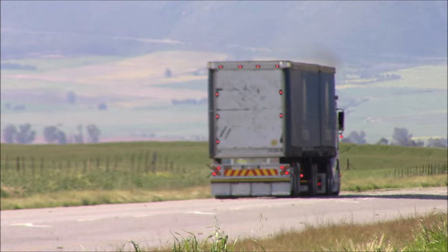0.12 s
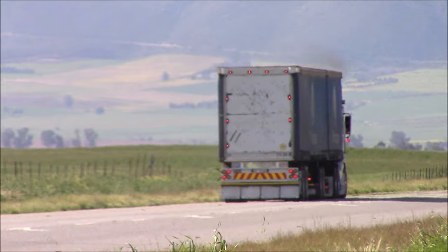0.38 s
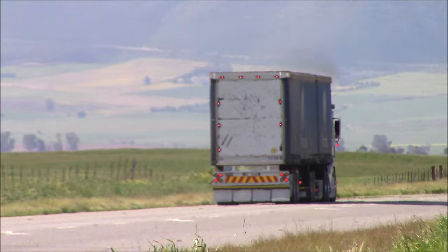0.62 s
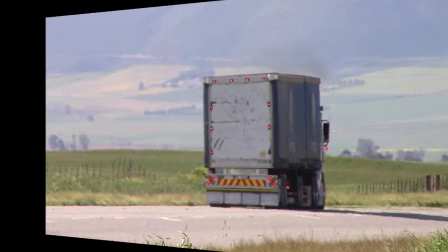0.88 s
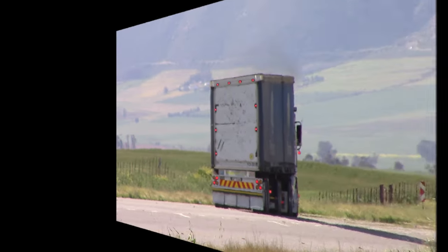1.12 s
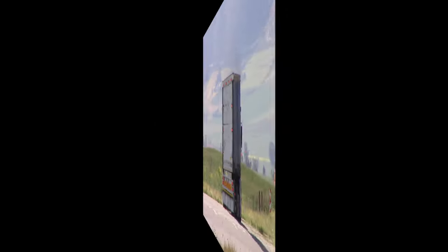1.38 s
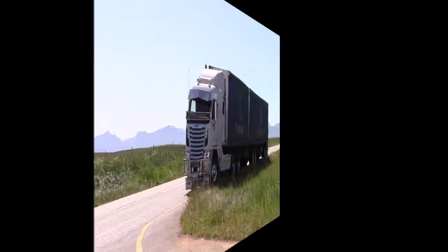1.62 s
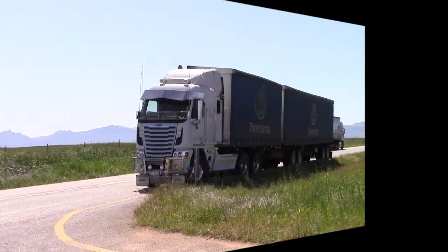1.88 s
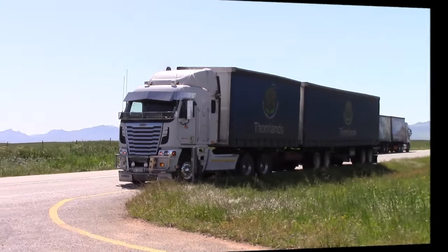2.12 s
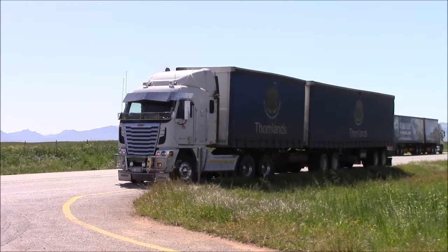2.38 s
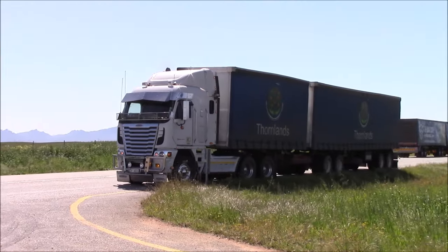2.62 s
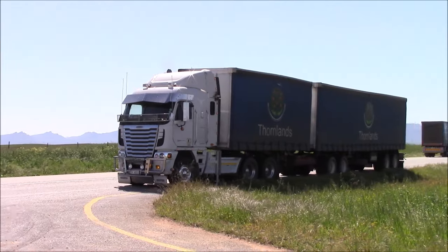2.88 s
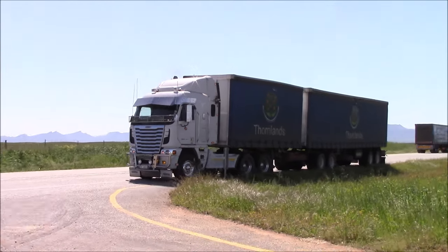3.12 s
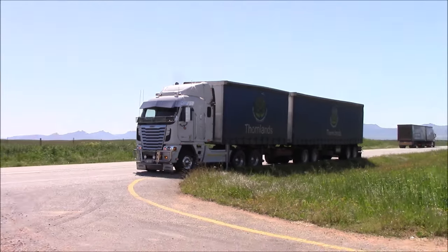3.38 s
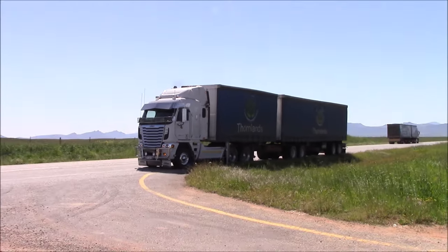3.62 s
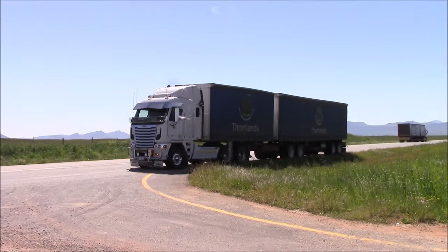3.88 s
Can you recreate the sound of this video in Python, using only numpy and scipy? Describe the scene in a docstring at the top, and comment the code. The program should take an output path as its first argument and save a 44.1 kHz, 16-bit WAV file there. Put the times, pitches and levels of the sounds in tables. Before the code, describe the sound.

A heavy diesel truck engine dominates. From 0 s a distant truck's smooth tyre roar dies away, with a soft low thud near 0.3 s and two faint falling bird chirps around 0.7-0.95 s. From about 0.8 s the close diesel fades in, knocking, clattering and hissing, rising in pitch and loudness until 3.7 s, when the throttle lifts and pitch drops slightly to 4 s. Dry open air, almost centred.

```python
"""An open road: a far truck's tyre roar, with a soft thud and two bird chirps; then the scene changes,
crossfading to a six-cylinder diesel close by that revs up under load until the throttle is lifted. The roar is
coloured noise, the thud a rung resonance, the chirps gliding sines. Exhaust puffs ring the pipes, combustion
knocks ring the block (hardest once per crank turn), and cab roar, panel buzz, clatter and fan hiss pulse with
the firings."""
import sys
import numpy as np
from scipy import signal
from scipy.io import wavfile

SR = 44100
rng = np.random.default_rng(int(sys.argv[2]) if len(sys.argv) > 2 else 0)


def boost_factor(decibels):
    """Convert a level in decibels to a linear amplitude factor."""
    exponent = np.asarray(decibels, float) / 20
    return 10 ** exponent


def wrap_up_sound(samples):
    """Save the sound to the file named by the first command line argument, as 16-bit audio."""
    columns = np.atleast_2d(samples).T
    # keep every value between -1 and 1, then stretch to whole-number steps
    tamed = np.clip(columns, -1, 1)
    steps = np.round(tamed * 32767).astype(np.int16)
    wavfile.write(sys.argv[1], SR, steps)


N = 176400


def rms_one(x):
    """Power normalisation: scales a signal to rms 1."""
    return x / np.sqrt(np.mean(x ** 2) + 1e-20)


def in_time(rows):
    """Linear interpolation: joins each table column over time, sample by sample."""
    times, *columns = np.transpose(rows)
    return [np.interp(np.arange(N) / SR, times, column) for column in columns]


def filtered(x, order, hz, kind):
    """Butterworth filtering: a maximally flat pass band."""
    return signal.sosfilt(signal.butter(order, hz, kind, fs=SR, output="sos"), x)


def drift(rate_hz):
    """Low-passed noise: a slow random wander of rms 1."""
    step = 40  # samples between the points of the wander
    pole = np.exp(-2 * np.pi * step * rate_hz / SR)
    noise = rng.standard_normal(N // step + 2002)
    slow = signal.lfilter([1], [1, -2 * pole, pole * pole], noise)[2000:]  # settled part
    return np.interp(np.arange(N) / step, np.arange(len(slow)), rms_one(slow))


def resonate(x, hz, width_hz):
    """Damped resonance: a two-pole filter with gain 1 at its peak."""
    radius = np.exp(-np.pi * width_hz / SR)
    zeros = np.array([1, 0, -1]) * (1 - radius * radius) / 2
    poles = [1, -2 * radius * np.cos(2 * np.pi * hz / SR), radius * radius]
    return signal.lfilter(zeros, poles, x + 1e-18)


def body(x, modes):
    """Modal superposition: parallel resonances with alternating signs."""
    out = 0
    for k, (hz, width_hz, db) in enumerate(modes):
        out = out + (-1) ** k * boost_factor(db) * resonate(x, hz, width_hz)
    return out


# stereo width of the noises: (frequency [Hz], side level against mid [dB])
SIDE_WIDTH = [(60, -71), (110, -72), (200, -44), (380, -36), (700, -29), (1290, -35), (2380, -21),
              (4400, -25.5), (8120, -27.5), (15000, -37)]


def coloured(spectrum, patchy_db):
    """Band synthesis: flickering noise bands of about a third octave, nearly centred; rms 1."""
    hz, db = np.transpose(spectrum)
    side_hz, side_db = np.transpose(SIDE_WIDTH)
    edges = np.geomspace(hz[0], hz[-1], int(3 * np.log2(hz[-1] / hz[0])))
    white = rng.standard_normal((2, 2, N))  # neighbouring bands take different noise
    out = 0
    for k, (low, high) in enumerate(zip(edges, edges[1:])):
        mid, side = filtered(white[k % 2], 2, [low, high], "band")
        centre = np.log(low * high) / 2
        gain = boost_factor(np.interp(centre, np.log(hz), db) + patchy_db * drift(15))
        side_gain = boost_factor(np.interp(centre, np.log(side_hz), side_db))
        out = out + gain * (mid + side_gain * side * [[1], [-1]])
    return rms_one(out)


# tyre roar level: (time [s], level [dB])
ROAR_LEVEL = [(0, -44), (.15, -45.5), (.5, -46.5), (.85, -48), (1.3, -52.5), (2.2, -84)]
# tyre roar spectrum shape: (frequency [Hz], relative density [dB per Hz])
ROAR_SPECTRUM = [(24, -82), (40, -52), (59, -26.5), (183, -19), (306, -31), (487, -15.5), (638, -11),
                 (687, -11), (1240, -2), (2120, -19), (2920, -24), (4110, -37.5), (14000, -48.5)]


def far_truck():
    """Broadband tyre noise: a smooth roar that fades away."""
    return boost_factor(in_time(ROAR_LEVEL)[0]) * coloured(ROAR_SPECTRUM, patchy_db=1.3)


def thud():
    """Impulse response: one click rings two damped resonances in series, a dull low bump."""
    start_s, hz, width_hz, peak_db = 0.279, 183, 88, -45.5
    click = np.zeros(N)
    click[int(start_s * SR)] = 1
    ring = resonate(resonate(click, hz, width_hz), hz, 2 * width_hz)
    return boost_factor(peak_db) * ring / np.abs(ring).max()


# bird chirps: (start [s], length [s], first pitch [Hz], last pitch [Hz], peak level [dB])
WHISTLES = [(.69, .058, 4480, 4120, -68), (.735, .22, 5280, 4530, -67)]


def bird():
    """Frequency modulation: sine whistles that fall fastest at the start."""
    bend = 1.8  # exponent of the fall
    out = np.zeros(N)
    for start_s, length_s, from_hz, to_hz, db in WHISTLES:
        u = np.linspace(0, 1, int(length_s * SR))
        hz = to_hz + (from_hz - to_hz) * (1 - u) ** bend
        envelope = np.sin(np.pi * np.sqrt(u))  # quick rise, slower fall
        tone = np.sin(2 * np.pi * np.cumsum(hz) / SR)
        out[int(start_s * SR):][:len(u)] += boost_factor(db) * envelope * tone
    return out


def grown(db, db_per_hz, rate):
    """Speed dependence: a gain that changes with the firing rate and equals db at 55 firings/s."""
    return boost_factor(db + db_per_hz * (rate - 55))


def unevenness(rate):
    """Cylinder imbalance: firings are more alike near idle and again at high speed."""
    return np.interp(rate, [36, 44, 65, 73], [0.55, 1, 1, 0.35])  # by firings/s


def firings(rate, pattern_db, scatter_db, jitter_s, uneven=1):
    """Periodic impulse train: one click per firing, strength by cylinder, even power at all speeds."""
    hard_firing_s = 2.3095  # a moment when the hardest-knocking cylinder fires
    count = np.cumsum(rate) / SR
    count -= count[int(hard_firing_s * SR)]
    at = np.flatnonzero(np.diff(np.floor(count))) + 1
    late, strength = rng.standard_normal((2, len(at)))
    where = np.clip(at + (jitter_s * SR * late).astype(int), 0, N - 1)
    cylinder = np.floor(count[at]).astype(int) % 6
    by_cylinder_db = np.array(pattern_db)[cylinder] - np.mean(pattern_db)
    clicks = np.zeros(N)
    clicks[where] = boost_factor(by_cylinder_db * (uneven * np.ones(N))[at] + scatter_db * strength)
    return rms_one(clicks / np.sqrt(rate))


def swell(clicks, depth):
    """Amplitude modulation: a gain that jumps at each click and dies away, over a steady part."""
    decay_s = 0.008
    depth = np.clip(depth, 0, 1)
    pulses = signal.lfilter([1], [1, -np.exp(-1 / (decay_s * SR))], clicks)
    return 1 - depth + depth * rms_one(pulses)


def rumble(rate):
    """Low-passed noise: a deep rumble that grows with speed."""
    return grown(9, 0.1758, rate) * rms_one(filtered(rng.standard_normal(N), 2, 90, "low"))


# clatter and fan hiss spectrum shape: (frequency [Hz], relative density [dB per Hz])
CLATTER_SPECTRUM = [(530, 5), (900, -4), (955, -1.5), (1290, -12), (1540, -13), (2200, -8.5), (2760, -13.5),
                    (3670, -16), (5000, -22), (6050, -22), (8750, -27), (10700, -35.5), (15500, -105)]


def clatter(ticks):
    """Modulated noise: clatter and fan hiss pulse slightly with the firings."""
    return boost_factor(14.5) * swell(ticks, 0.12) * coloured(CLATTER_SPECTRUM, patchy_db=0.45)


# valve-gear and panel resonances: (frequency [Hz], width [Hz], relative level [dB])
PANEL_MODES = [(1658, 118, 5.5), (2161, 120, 1.5), (2484, 125, -2), (3000, 110, -3), (3300, 52, -1),
               (3610, 260, -3.5), (4175, 150, -8), (5700, 140, -12), (6300, 200, -14), (7600, 500, -18),
               (10030, 1000, -22.5)]


def panels(rate, ticks):
    """Forced vibration: ticks and pulsing noise ring the valve gear and panels."""
    uneven = unevenness(rate)
    buzz = swell(ticks, 0.75 * uneven) * rng.standard_normal(N)
    ringing = body(boost_factor(-6) * uneven * ticks + buzz, PANEL_MODES)
    return grown(7, 0.0321, rate) * rms_one(filtered(ringing, 2, [1400, 11000], "band"))


# cab resonances: (frequency [Hz], width [Hz], relative level [dB])
CAB_MODES = [(425, 51, -2), (545.3, 39.6, 0), (613.5, 36.5, -1), (724, 82, -6), (792, 31, -4),
             (1337, 150, -14.5)]


def cab_roar(knocks):
    """Cavity resonance: noise that swells at each knock rings the cab."""
    rattle = swell(knocks, 0.42) * rng.standard_normal(N)
    return rms_one(filtered(body(rattle, CAB_MODES), 2, [400, 1400], "band"))


# block resonances: (frequency [Hz], width [Hz], relative level [dB], growth [dB per Hz of firing rate])
BLOCK_MODES = [(555, 130, -1, -.2), (690, 130, -4, .05), (810, 110, -.5, .25), (1040, 120, -12, -.3)]


def block_knock(rate, knocks):
    """Structural resonance: combustion knocks ring the modes of the engine block."""
    ringing = 0
    for hz, width_hz, db, growth_db in BLOCK_MODES:
        twice = resonate(resonate(knocks, hz, width_hz), hz, width_hz)
        ringing = ringing + grown(db, growth_db, rate) * twice
    return filtered(rms_one(ringing), 3, [460, 1140], "band")


def block(rate, knocks):
    """Power-weighted sum: cab roar joins the block knock with a share that grows with speed."""
    cab_share = np.maximum(boost_factor(-7), grown(-6, 0.6, rate))
    return (block_knock(rate, knocks) + cab_share * cab_roar(knocks)) / np.sqrt(1 + cab_share ** 2)


# puff strength in the long pipe, in firing order: one relative level [dB] per cylinder
CYLINDER_PUFFS = [-0.15, 1.5, -0.53, -4.1, 2.8, -0.09]
# puff strength in the tailpipe, in firing order: one relative level [dB] per cylinder
TAIL_PUFFS = [-3.5, 1.5, .5, -3, 1.5, 0]
# long exhaust pipe resonances: (frequency [Hz], width [Hz], relative level [dB])
PIPE_MODES = [(71.4, 15.4, -2.5), (130.3, 16, 3), (146.3, 46, -3.5)]
# tailpipe resonances: (frequency [Hz], width [Hz], relative level [dB])
TAILPIPE_MODES = [(233.3, 53.5, 0), (296, 27.1, 3), (364, 24, -7.5)]


def exhaust(rate):
    """Air-column resonance: puffs and turbulent flow noise ring the long pipe and the tailpipe."""
    pipe_flow, tail_flow = boost_factor(-19) * rng.standard_normal((2, N))
    pipe_puffs = firings(rate, CYLINDER_PUFFS, scatter_db=0.5, jitter_s=0.0001)
    tail_puffs = firings(rate, TAIL_PUFFS, scatter_db=1, jitter_s=0.0002)
    deep = body(pipe_puffs + pipe_flow, PIPE_MODES)
    # extra turbulence in the tailpipe is strongest near idle
    upper = body(tail_puffs + grown(4, -0.35, rate) * tail_flow, TAILPIPE_MODES)
    both = grown(0, 0.16, rate) * deep - upper
    notched = rms_one(both - resonate(both, 187.5, 23))
    lag_s = 0.0028  # puffs leave the pipe after the knock
    return np.roll(filtered(notched, 3, 380, "low"), int(lag_s * SR))


# engine speed: (time [s], firing rate [firings per s])
FIRING_RATE = [(.8, 33.9), (1.3, 37.2), (1.5, 38.95), (1.65, 42.8), (1.85, 46.9), (2.1, 51.1), (2.4, 56.7),
               (2.7, 62.15), (3.0, 67.1), (3.3, 72.2), (3.58, 76.75), (3.72, 78.1), (3.8, 76.3),
               (3.88, 74.7), (4.0, 73.6)]
# engine gains: (time [s], overall gain [dB], exhaust gain before it [dB], knock gain before it [dB])
ENGINE_GAINS = [(.84, -75, 22, 16), (1.0, -69.5, 21, 21.5), (1.2, -65, 20, 18), (1.45, -61.5, 20.5, 21.5),
                (1.7, -57.5, 21.5, 23), (2.0, -56, 26, 22), (2.3, -53.5, 25, 24.5), (2.6, -51, 27, 25.5),
                (2.85, -49.5, 29, 25), (3.05, -47, 27, 24), (3.3, -47.5, 25, 27), (3.55, -45, 25, 23.5),
                (3.72, -47, 28, 24.5), (3.82, -46.5, 18, 23.5), (3.92, -45, 10.5, 22), (4.0, -43.5, 14, 22)]
# knock strength, in firing order: one relative level [dB] per cylinder
CYLINDER_KNOCKS = [0, -8, -8.5, -1, -7, -9]


def engine():
    """Synchronous excitation: one firing rate drives the exhaust, knock, cab, panels and clatter."""
    rate, = in_time(FIRING_RATE)
    loud_db, exhaust_db, knock_db = in_time(ENGINE_GAINS)
    knocks = firings(rate, CYLINDER_KNOCKS, 1.3, 0.0002, unevenness(rate))
    ticks = firings(rate, CYLINDER_PUFFS, 1.3, 0.0004)
    noises = rumble(rate) + panels(rate, ticks) + clatter(ticks)
    parts = boost_factor(exhaust_db) * exhaust(rate) + boost_factor(knock_db) * block(rate, knocks) + noises
    fade_start_s, fade_length_s = 0.81, 0.13
    fade = np.clip((np.arange(N) / SR - fade_start_s) / fade_length_s, 0, 1)
    return fade * boost_factor(loud_db) * parts


def scene():
    """Linear superposition: all sources add, nearly centred."""
    return far_truck() + thud() + bird() + engine()


def top_cut(x):
    """Nothing passes above the cut-off."""
    return signal.sosfilt(signal.butter(12, 15710, fs=SR, output="sos"), x)


def record(dry):
    """High-pass response: the microphone drops the deep bass."""
    finished = filtered(dry, 3, 77, "high")
    return top_cut(finished)


dry = scene()
out = record(dry)
wrap_up_sound(out)
```